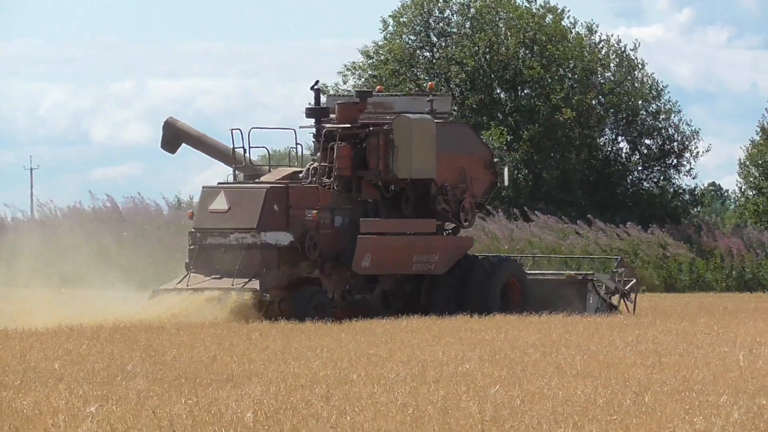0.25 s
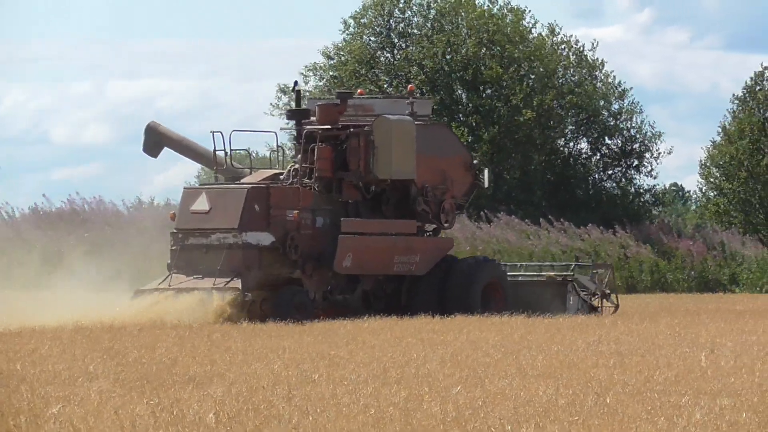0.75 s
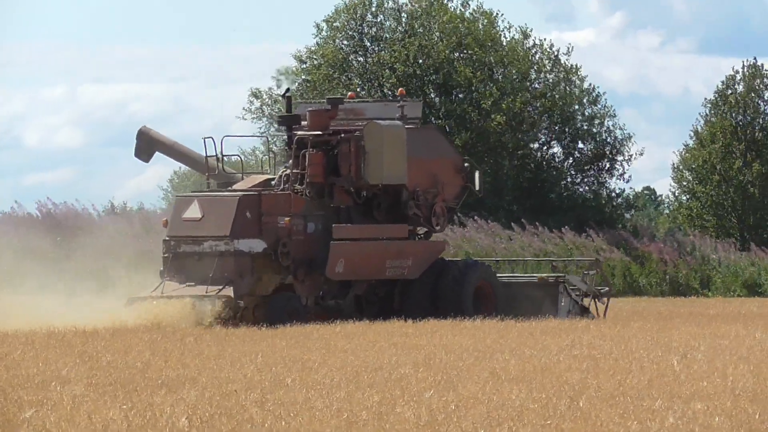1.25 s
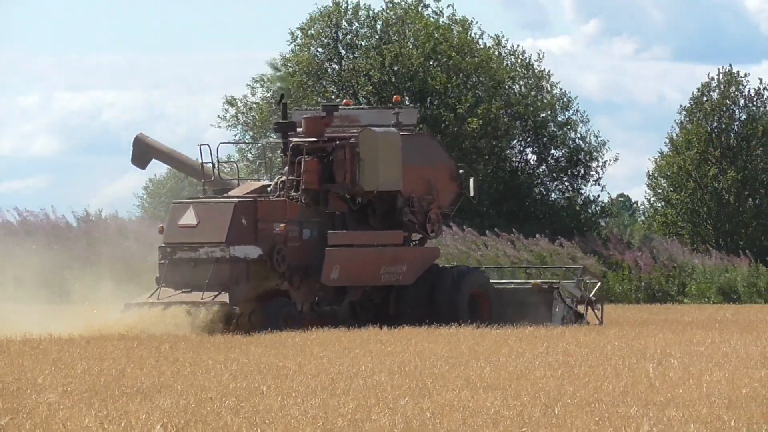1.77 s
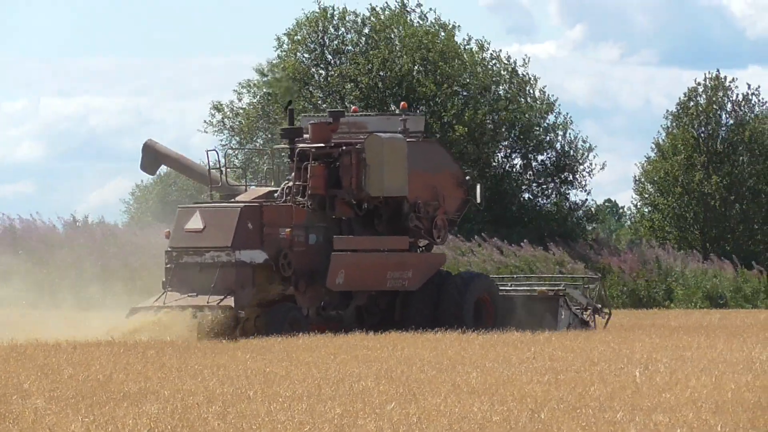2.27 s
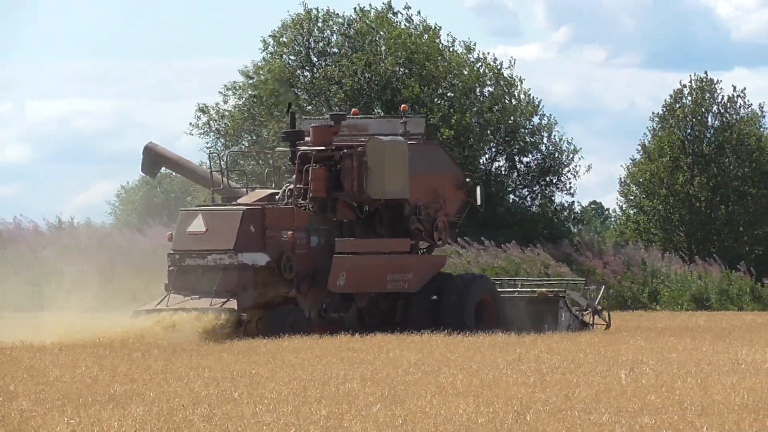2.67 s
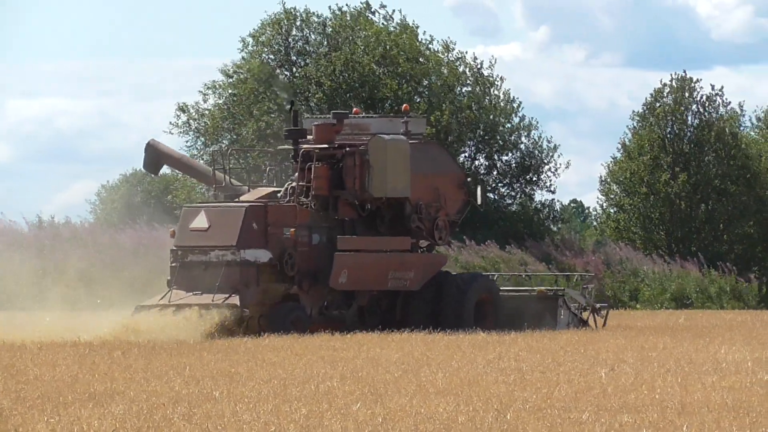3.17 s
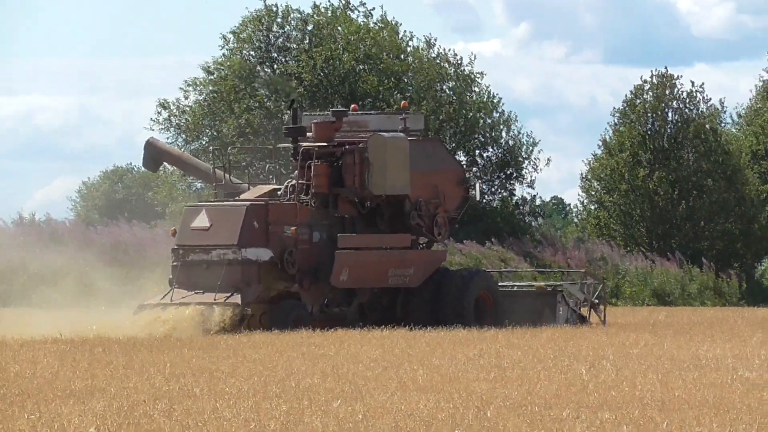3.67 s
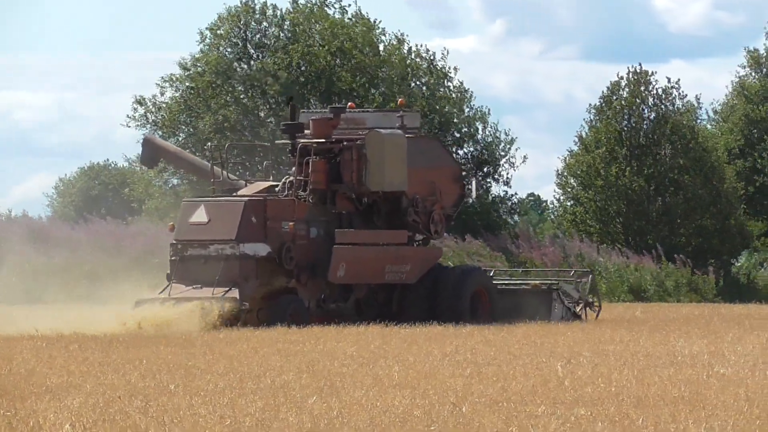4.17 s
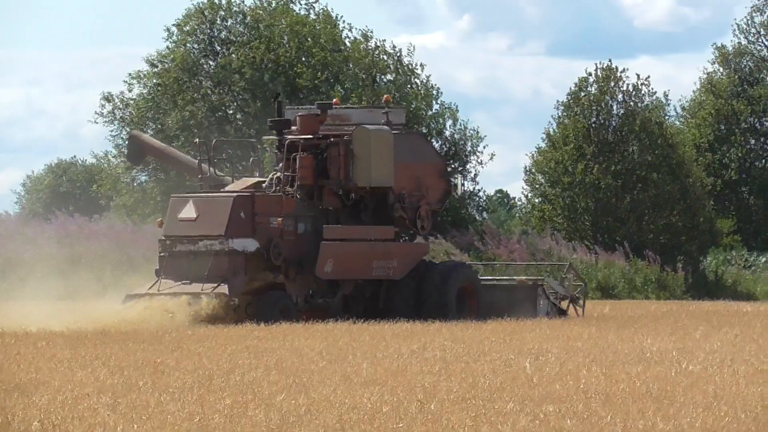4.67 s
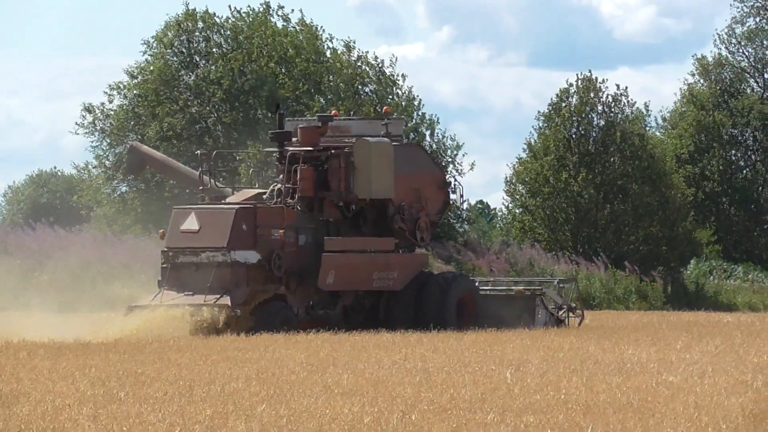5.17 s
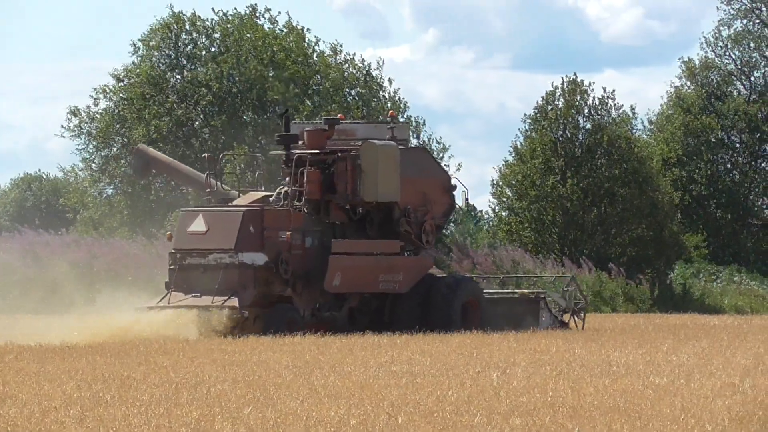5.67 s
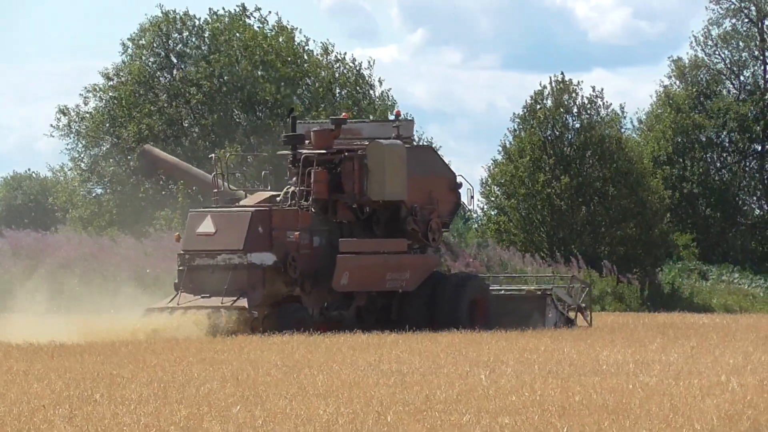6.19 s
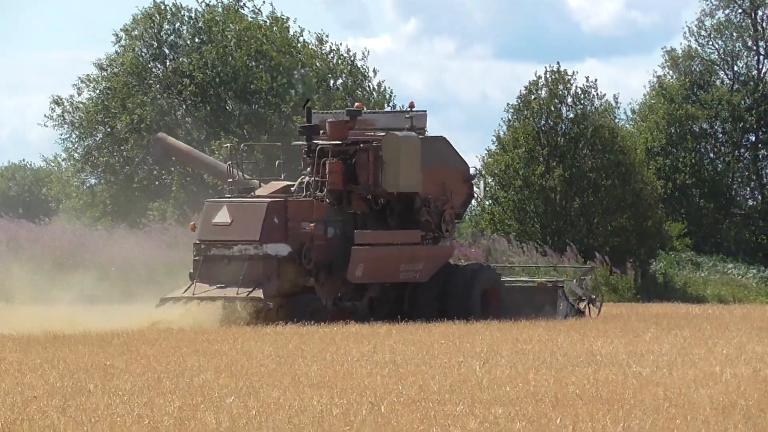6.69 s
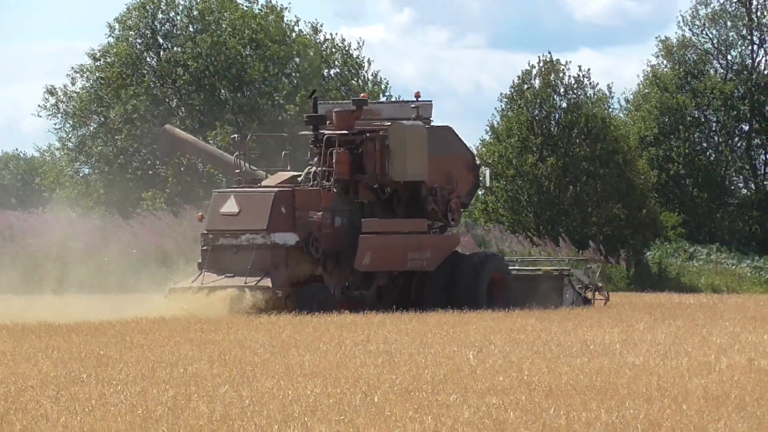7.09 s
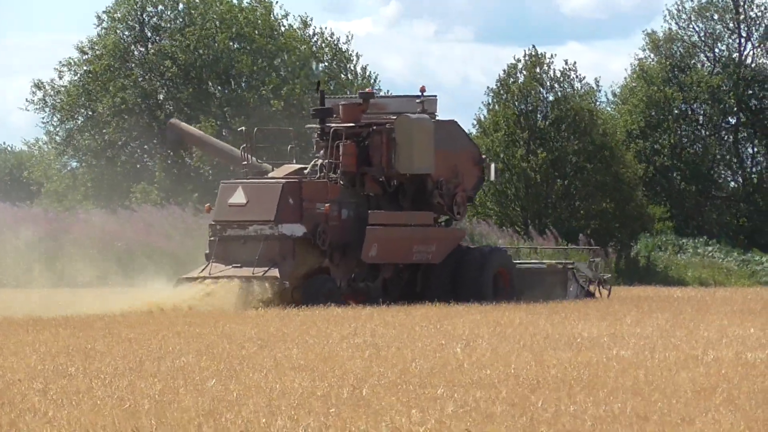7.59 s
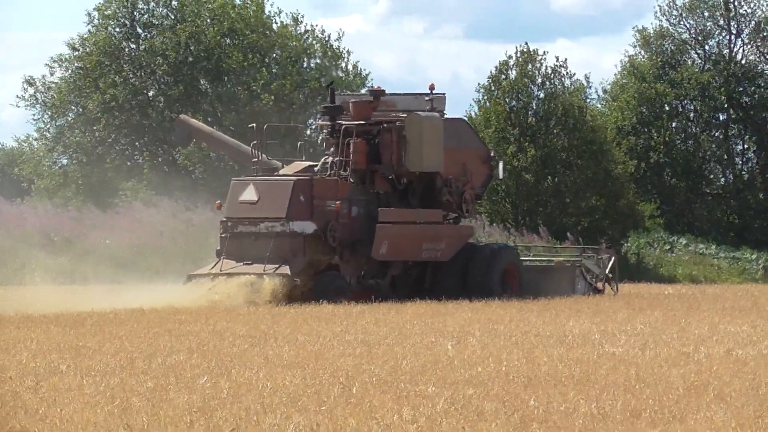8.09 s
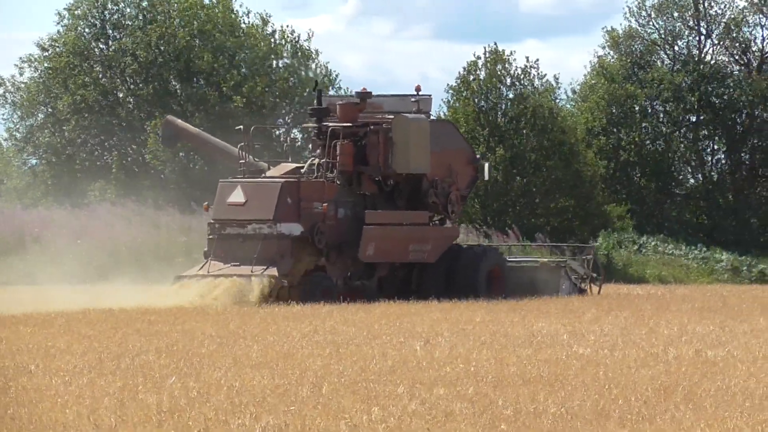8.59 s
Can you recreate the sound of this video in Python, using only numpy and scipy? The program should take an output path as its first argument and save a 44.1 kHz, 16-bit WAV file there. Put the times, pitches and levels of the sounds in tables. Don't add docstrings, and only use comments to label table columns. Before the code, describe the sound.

For about 8.8 seconds, wind buffets a small camera microphone in an open grain field, with a combine harvester roaring some fifty metres away. Low rumble and soft, dull slaps dominate from the start, a strong slap landing near 0.3 s and others following irregularly throughout. Behind them the machine runs continuously: dense dry rattle of straw and grain, metallic mid-range roar, airy chaff hiss and rapid exhaust throbbing. A thin, very high turbo whistle flashes out around 0.8, 1.75 and 2.5 s, with gear tones also singing near 2.5-2.8 s. From 3.5 to 5.5 s the air often clears, bringing brighter hiss, whistle and hollow casing rings around 4.5-5.3 s. The wind dips briefly near 6.55 s; casing resonance returns around 7-7.4 s as gusts swell. After 8 s the machine dulls somewhat, still running beneath fluttering wind.

```python
import sys
import numpy as np
from scipy import signal
from scipy.fft import rfft, irfft
from scipy.io import wavfile
from scipy.ndimage import uniform_filter1d

SR = 44100
rng = np.random.default_rng(int(sys.argv[2]) if len(sys.argv) > 2 else 0)


def undo_db(level):
    steps = np.asarray(level, float) / 20
    return 10 ** steps


def persist_wave(psi):
    counts = np.round(np.clip(psi, -1, 1) * 32767).astype(np.int16)
    wavfile.write(sys.argv[1], SR, np.atleast_2d(counts).T)


N = 389844

# (t/s, buffet level/dB)
WIND = [(0.0, -19), (0.8, -20), (1.61, -20), (2.41, -20.5), (3.21, -22.3), (4.02, -21), (4.82, -25.5),
        (5.63, -21), (6.43, -25), (7.23, -25.5), (8.04, -23.5), (8.84, -26)]
# (f/Hz, level/dB per Hz)
WIND_COLOUR = [(13, -63), (22, -35.5), (123, -1), (174, 0.5), (285, -4), (535, -16.5), (1300, -33.5),
               (1690, -44.5), (2860, -120)]
WIND_BANDS_HZ = (55, 130, 250, 600)
# (t/s, change/dB, half length/s)
GUSTS = [(0.48, -6.5, 0.02), (0.96, -1.5, 0.039), (1.25, 1.5, 0.034), (1.34, -8, 0.027), (1.42, 14, 0.021),
         (2.75, 5.5, 0.05), (2.94, 7, 0.05), (3.07, -6.5, 0.04), (3.38, -3.5, 0.063), (3.6, 6, 0.015),
         (3.68, -5, 0.033), (3.84, 11, 0.034), (4.1, -7.5, 0.029), (4.69, -6, 0.026), (4.91, 5.5, 0.054),
         (5.12, 4.5, 0.016), (5.31, -2, 0.066), (5.48, -7, 0.05), (5.95, -1.5, 0.028), (6.15, 7, 0.026),
         (6.29, 6.5, 0.02), (6.55, -9, 0.023), (6.68, 7, 0.034), (7.13, 6.5, 0.048), (7.36, 9, 0.049),
         (7.63, 7.5, 0.087), (7.77, 5.5, 0.22), (8.08, 8.5, 0.02), (8.38, 0, 0.015), (8.49, 7, 0.055),
         (0.1, 4.5, 0.027), (0.66, 3, 0.035), (1.52, 2.5, .04), (1.75, -3.5, 0.036), (1.95, 3, 0.024),
         (2.06, 5.5, 0.019), (2.25, -1.5, 0.043), (2.4, 0.5, 0.036), (2.52, 5, 0.018), (3.2, -0.5, 0.035),
         (4.25, -1, .04), (4.5, -3, 0.042), (5.6, 6, 0.027), (5.8, 2.5, 0.033), (6.85, 3.5, 0.043),
         (6.96, 5, 0.044), (8.25, -0.5, .04), (8.7, 0.5, 0.07)]
# (t/s, change/dB, half length/s)
ROLLS = [(0.35, 6, 0.08), (0.74, 5.5, 0.081), (1.3, -11, 0.058), (1.47, -1, 0.04), (3.62, 1, 0.019),
         (3.78, 5, 0.074), (4.69, -9, 0.04), (4.85, 9.5, 0.05), (5.15, -8, 0.041), (5.22, 8, 0.059),
         (5.4, 10, 0.037), (5.59, 6.5, 0.071), (6.01, 10, 0.04), (6.53, -10, 0.065), (6.85, 6.5, 0.033),
         (6.96, -10, 0.034), (7.59, 13, 0.025), (8.02, -7, 0.033), (8.21, -5, 0.15), (8.75, -10, 0.036)]
# (t/s, change/dB, half length/s)
RUSTLES = [(0.18, 6.5, 0.043), (1.24, -9, 0.034), (1.33, 7, 0.026), (1.71, -5.5, 0.051), (2.02, 4, 0.036),
           (2.46, 3.5, 0.054), (2.72, -5, 0.13), (3.17, -7, 0.07), (3.54, 1.5, 0.064), (4.26, -5, 0.046),
           (4.92, -6, 0.09), (5.43, 6, 0.081), (5.96, 6.5, 0.05), (6.15, -2.5, 0.085), (7.38, 8, 0.042),
           (7.69, 5.5, 0.034), (8.12, 9, 0.02), (8.24, -5, 0.09), (8.41, 9, 0.05), (8.58, 9, 0.054),
           (0.34, 6.5, 0.02), (0.65, 4, 0.021), (0.95, -4, 0.032), (1.45, -2.5, 0.071), (2.2, 3, .04),
           (3.9, -4, .04), (4.6, -3, 0.059), (5.2, 4.5, 0.022), (5.65, -3.5, 0.046), (6.52, 0, .04),
           (6.65, 6.5, .04), (7.0, 3.7, 0.1), (8.78, 0, 0.038)]
# (t/s, change/dB, half length/s)
LULL = [
    (6.555, -10, 0.022),
]
# (t/s, peak level/dB, ring f/Hz)
SLAPS = [(0.258, 0, 230), (0.383, -7, 221), (0.669, -10.5, 170), (0.752, -6, 212), (1.139, -3, 283),
         (1.227, -3, 217), (1.409, -4, 236), (1.787, -6, 255), (1.841, -4.5, 224), (2.17, -4, 260),
         (2.716, -6.5, 236), (2.8, -6, 227), (2.852, -5.5, 147), (2.914, -7, 226), (2.973, -7, 185),
         (3.183, -6, 205), (3.252, -10, 258), (3.516, -4, 266), (3.722, -5, 288), (3.836, -1, 211),
         (3.916, -12, 261), (4.025, -16, 182), (4.242, -5, 255), (4.37, -6, 184), (4.597, -8.5, 162),
         (4.815, -8.5, 168), (4.948, -6.5, 177), (5.043, -10.5, 167), (5.094, -8, 183), (5.328, -4.5, 214),
         (5.562, -5, 255), (6.011, -4.5, 174), (6.101, -9, 172), (6.312, -9, 176), (6.598, -13, 160),
         (6.772, -8, 167), (6.89, -7, 178), (6.96, -8, 225), (7.128, -3.5, 194), (7.206, -7, 226),
         (7.514, -12, 220), (7.594, -4.5, 190), (7.724, -9, 157), (7.795, -4, 215), (8.048, -5.5, 242),
         (8.375, -5, 202)]
# (t/s, peak level/dB, ring f/Hz)
FLICKS = [(0.104, -16.5, 450), (0.203, -19, 452), (0.314, -16.5, 466), (0.944, -22, 563), (1.426, -29, 490),
          (1.549, -21, 690), (2.014, -15, 471), (2.141, -21, 452), (3.389, -23, 665), (4.37, -21, 470),
          (6.018, -19.5, 710), (6.5, -21.5, 654), (7.506, -19, 743), (8.303, -21, 525), (8.372, -14, 456)]
THROB = [
    (3, 0.02),
    (4, 0.26),
    (8, 0.12),
]
# (t/s, clearness of the air/dB, crop load/dB)
CARRY = [(0.0, -0.5, 3), (0.59, -2, -1.5), (1.18, -5, 0), (1.77, -2, -3), (2.36, 0.2, 4), (2.95, 0, 1.5),
         (3.54, 4, 2.5), (4.13, 1, 1), (4.71, 4.5, 4), (5.3, 3.5, 2.5), (5.89, -0.5, 0.7), (6.48, 1, 0.5),
         (7.07, 4, 4), (7.66, 2.5, 3), (8.25, -6, -2.5), (8.84, -1, -2)]
# (t/s, change/dB, half length/s)
CLEAR_SPELLS = [(0.25, -1.5, 0.081), (0.48, -3.5, 0.046), (0.7, 1.5, 0.11), (0.83, 0.5, 0.05),
                (2.19, -5.5, 0.074), (2.44, 2, 0.076), (2.53, 4.5, 0.053), (2.6, 1, 0.027),
                (2.74, 4, 0.097), (3.11, -3.5, 0.055), (3.28, 3.5, 0.028), (4.0, 3, 0.038),
                (4.45, -2, 0.05), (4.87, -3, 0.12), (5.32, -2, 0.043), (5.71, -3.5, 0.046), (5.96, 3, 0.04),
                (6.12, -3, 0.075), (6.6, 2.5, 0.085), (6.81, -2.5, 0.059), (7.7, 0, 0.062),
                (7.84, 1.5, 0.05), (2.95, 0, .04), (3.2, 1, 0.036), (4.15, 2.5, .05), (3.7, -1.3, .1),
                (5.1, -0.5, 0.055), (7.05, 2, .12), (7.5, -2, .05), (8.55, 0, .05), (8.68, -3, 0.056),
                (0.1, 4, 0.013), (0.65, 2.5, 0.023), (2.03, 0.7, 0.018), (1.4, 0, 0.052), (1.9, 0, .06),
                (8.41, 3.5, 0.11)]
# (t/s, change/dB, half length/s)
SURGES = [(0.67, 6, 0.047), (0.78, 4, 0.05), (0.98, -2, 0.05), (1.57, 3, 0.099), (1.89, 3, 0.04),
          (2.23, -5.5, 0.12), (2.34, -0.5, 0.036), (3.14, -2, 0.14), (3.42, -2.9, 0.11),
          (3.92, -2.5, 0.032), (4.24, -3.5, 0.04), (4.32, -2, 0.19), (4.44, -0.5, 0.04), (4.91, -3, 0.061),
          (5.12, 0, 0.056), (5.33, -2.5, 0.044), (5.69, -3, 0.05), (6.1, -2.5, 0.18), (7.28, 2, 0.13),
          (7.96, -2, 0.06), (8.19, -2, 0.037), (8.43, 2, 0.11)]
# (f/Hz, level/dB per Hz)
MACHINE_COLOUR = [(500, -4), (800, 6.5), (1440, -2), (1770, -15.5), (2110, -11.5), (2350, -15.5),
                  (2560, -20.5), (2800, -18.5), (4700, -23), (5700, -23), (6600, -21.5), (7520, -23),
                  (9300, -17), (15500, -31)]
CARRY_BANDS_HZ = (1400, 2200, 5000, 11500)
# (mean level/dB, change/dB per dB of clearness, change/dB per dB of load)
PARTS = [
    (-41.5, -0.4, 1.55),
    (-51, 0.03, 1.62),
    (-53, 1.24, 0.02),
    (-61, 0.76, -0.2),
]
# (f/Hz, level over the shaft's singing level/dB, wander/Hz)
GEARS = [
    [(2058, 4.5, 18), (2184, 3.5, 18), (3102, -3, 12)],
    [(4593, -3.5, 6)],
    [(6386, -7, 10), (6596, -2, 9), (7122, -6, 16)],
    [(4112, 0, 10)],
]
# (t/s, gain/dB, half length/s)
SING = [
    [(2.8, 8, 0.15), (4.9, 5, 0.38), (5.1, 9, .06), (7.19, 4, 0.16), (5.12, 2.5, .06)],
    [(1.5, 5, 0.11), (1.8, 7, .05), (2.02, 1, .08), (6.7, 0, .06), (2.54, 15, .09), (3.4, -1, .2),
     (4.0, 3, .06), (4.37, 9, 0.044), (4.68, 5, .07), (5.22, 6, .07), (5.6, 5, .1), (5.96, 6, .04),
     (8.39, 10, .05)],
    [(1.7, 6, .25), (2.6, 9, .1), (4.65, 5, .07), (5.5, 4, .15), (5.96, 6, .05), (7.04, 4, .08),
     (7.85, 6, .05)],
    [(2.53, 12, .04), (2.76, 8, .05), (3.45, 13, .04), (4.0, 11, 0.083), (5.0, 9, .08), (5.25, 5, .05),
     (5.78, 11, .05), (5.93, 14, .05)],
]
# (t/s, gain/dB, half length/s)
CASING_RINGS = [(0.65, 19, 0.044), (2.5, 9, 0.069), (4.52, 14, 0.11), (4.78, 12, 0.1), (4.95, 15, 0.098),
                (5.15, 14, .1), (5.35, 11, 0.046), (6.95, 8, 0.16), (7.15, 15, .1), (7.35, 14, 0.097),
                (7.65, 2, 0.066)]
# (t/s, level/dB)
TURBO = [(0.0, -54.5), (0.8, -62.5), (1.61, -59.5), (2.41, -51.5), (3.21, -54.5), (4.02, -45),
         (4.82, -50.5), (5.63, -50), (6.43, -54.5), (7.23, -52), (8.04, -55), (8.84, -57)]
# (t/s, blade tone f/Hz)
TURBO_HZ = [(0, 9415), (.25, 9430), (.57, 9302), (1.06, 9262), (1.6, 9135), (2.3, 9095), (3.1, 9173),
            (3.67, 9365), (4.4, 9348), (4.68, 9380), (5.2, 9200), (5.42, 9288), (5.95, 9303), (6.45, 9450),
            (6.9, 9326), (7.3, 9375), (8.2, 9225), (8.84, 9369)]
# (t/s, gain/dB, half length/s)
FLASHES = [(0.32, 12, 0.026), (0.64, 8, 0.03), (0.83, 16, 0.034), (1.07, 8, 0.076), (1.52, 14, 0.011),
           (1.58, 15, 0.048), (1.66, 7.4, 0.03), (1.75, 20.5, 0.045), (1.85, 12, 0.03), (2.06, 11, 0.046),
           (2.37, 11.5, 0.037), (2.52, 19, 0.053), (2.72, 8, 0.027), (3.62, 5.5, 0.13), (4.74, 5.5, 0.061),
           (5.12, 7, 0.034), (5.28, 11, 0.033), (5.43, 12.5, 0.068), (5.51, 10, 0.012), (5.58, 16, 0.017),
           (5.73, 9.5, 0.038), (6.08, 7, 0.062), (6.26, 10, 0.04), (6.63, 13, 0.15), (6.73, 5, 0.018),
           (6.98, 10.5, 0.063), (7.15, 10, 0.02), (7.45, 12, 0.023), (7.57, 13, 0.011), (7.67, 14, 0.02),
           (3.85, -1, .04), (4.0, 5, .04), (4.3, -2.5, 0.059), (4.55, -1, 0.046), (4.95, 2, .05),
           (6.8, -1, 0.051), (7.3, 3, .03), (7.85, -7, 0.05), (8.2, 2, .04), (8.35, -7, 0.055),
           (8.55, 2, .06), (8.75, 0, .04)]
# (f/Hz, level against the local mean below which a line is lost/dB)
THIN_DB = [(2500, -17.5), (5450, -20), (5650, 6), (5850, -8), (6220, 4.5), (6550, -4), (7600, -0.2),
           (8000, -14), (9300, -5), (9620, -4), (10200, -3), (11000, -5), (13000, 0), (14800, 3),
           (15600, 8)]
# (f/Hz, side minus mid level/dB)
SIDE_DB = [(60, -35), (200, -28.5), (500, -34), (1000, -22), (2000, -14), (4000, -13.5), (8000, -9),
           (14000, -14)]


def smooth_twice(x, size):
    return uniform_filter1d(uniform_filter1d(x, size), size)


def walk(rate):
    k = int(SR / rate)
    held = np.repeat(rng.standard_normal(N // k + 1), k)
    w = smooth_twice(held, k)[:N]
    return w / w.std()


def curves(table):
    s, *columns = np.transpose(table)
    return [np.interp(np.arange(N) / SR, s, c) for c in columns]


def swells(events):
    out = np.zeros(N // 64 + 2)
    t = np.arange(len(out)) * 64 / SR
    for s, db, half_s in events:
        out += db * np.exp(-((t - s) / half_s) ** 2)
    return np.interp(np.arange(N) / SR, t, out)


def on_bins(points):
    hz, value = np.transpose(points)
    return np.interp(np.log(np.arange(N // 2 + 1) * SR / N + 1), np.log(hz), value)


def bands(x, colour, centres_hz):
    spectrum = rfft(x) * undo_db(on_bins(colour))
    hats = np.eye(len(centres_hz))
    parts = [irfft(spectrum * on_bins(np.c_[centres_hz, hat]), N) for hat in hats]
    return [p / p.std() for p in parts]


def even(x, seconds):
    return x / np.sqrt(smooth_twice(x ** 2, int(seconds * SR)) + 1e-12)


def tone(hz, fade_db, flutter_db):
    phase = 2 * np.pi * np.cumsum(hz) / SR + 0.8 * walk(60)
    y = np.sin(phase) * undo_db(fade_db * walk(9.5) + flutter_db * walk(30))
    return y / y.std()


def wind():
    breeze_db, gust_db = curves(WIND)[0], swells(GUSTS)
    eddies = rng.standard_normal(N) * undo_db(1.6 * walk(60))
    deep, low, body, bright = (even(p, 0.11) for p in bands(eddies, WIND_COLOUR, WIND_BANDS_HZ))
    body_db = breeze_db - 0.5 + 0.97 * gust_db + 1.33 * walk(20)
    low_db = np.linspace(-27.5, -23, N) + 0.055 * gust_db
    low_db = low_db + 0.77 * swells(ROLLS) + 0.78 * walk(18)
    bright_db = breeze_db - 8 + 0.4 * gust_db
    bright_db = bright_db + 0.71 * swells(RUSTLES) + 1.32 * walk(16)
    gusty = undo_db(body_db) * body + undo_db(low_db) * low + undo_db(bright_db) * bright
    return undo_db(swells(LULL)) * gusty + deep * undo_db(np.linspace(-38.5, -35, N))


def wind_gives_way():
    duck_db, duck_s = -10.0, 0.009
    return undo_db(swells([(s + duck_s * 0.66, duck_db, duck_s) for s, _, _ in SLAPS + FLICKS]))


def slaps(events, gain_db, cycles, hiss_db, rise_s):
    out, t = np.zeros(N + 2000), np.arange(2000) / SR
    push = (1 - np.exp(-t / rise_s)) ** 2
    noise = rng.standard_normal((len(events), 2 * len(t)))
    band = signal.butter(3, [450, 1000], "band", fs=SR)
    hiss = signal.lfilter(*band, noise)[:, len(t):]
    hiss = hiss * undo_db(hiss_db) / hiss.std() * np.exp(-t / 0.0088)
    for (s, db, hz), burst in zip(events, hiss):
        i = int(s * SR)
        ring = np.sin(2 * np.pi * hz * t) * np.exp(-t * hz / cycles)
        out[i:i + len(t)] += undo_db(db + gain_db) * push * (ring + burst)
    return out[:N]


def throb():
    cycle_hz = 16.82
    turn = 2 * np.pi * np.cumsum(cycle_hz * (1 + 0.0033 * walk(0.75))) / SR
    return sum(depth * np.cos(k * turn) for k, depth in THROB)


def rattle():
    strength = rng.exponential(size=N // 40 + 1).repeat(40)[:N]
    return rng.standard_normal(N) * undo_db(1.2 * strength)


def roar(grains, beat, clear_db, load_db):
    shimmer_db = 0.6 * walk(22)
    parts = bands(grains * (1 + 0.3 * beat), MACHINE_COLOUR, CARRY_BANDS_HZ)
    out = np.zeros(N)
    for part, (db, air, crop) in zip(parts, PARTS):
        level_db = db + air * clear_db + crop * load_db
        out += part * undo_db(level_db + shimmer_db + 0.7 * walk(18))
    return out


def gears(clear_db):
    out = np.zeros(N)
    for shaft, rest_db, moments in zip(GEARS, (-70, -64, -71, -71.5), SING):
        sing_db = rest_db + 1.4 * clear_db + swells(moments)
        for hz, db, wander_hz in shaft:
            mesh = tone(hz + wander_hz * walk(4.6), fade_db=1.0, flutter_db=5.0)
            out += undo_db(sing_db + db) * mesh
    return out


def casing(grains):
    ring_hz, width_hz, rest_db = 1412, 106, -58.5
    hz = np.arange(N // 2 + 1) * SR / N
    ring = irfft(rfft(grains) / (1 + ((hz - ring_hz) / width_hz) ** 4), N)
    return even(ring, 0.11) * undo_db(rest_db + swells(CASING_RINGS))


def machine(beat):
    grains = rattle()
    clear_db, load_db = curves(CARRY)
    clear_db = clear_db + swells(CLEAR_SPELLS) + 0.68 * walk(24)
    load_db = load_db + swells(SURGES)
    return roar(grains, beat, clear_db, load_db) + gears(clear_db) + casing(grains)


def turbo(beat):
    hz, db = curves(TURBO_HZ)[0], curves(TURBO)[0]
    whistle = tone(hz + 14 * walk(40), fade_db=0.5, flutter_db=4.0)
    whistle = whistle * (1 + 0.81 * beat) * undo_db(2.05 * walk(70))
    skirt = np.sin(2 * np.pi * np.cumsum(hz) / SR) * walk(150)
    return undo_db(db + swells(FLASHES) - 1.5) * (whistle + undo_db(-0.5) * skirt)


def scene():
    beat = throb()
    mid = wind() * wind_gives_way()
    mid = mid + slaps(SLAPS, gain_db=4.0, cycles=1.5, hiss_db=-24.0, rise_s=0.002)
    mid = mid + slaps(FLICKS, gain_db=3.0, cycles=1.6, hiss_db=-8.0, rise_s=0.0005)
    mid = mid + machine(beat) + turbo(beat)
    return np.array([mid, mid])


def thin_treble(x):
    hz, _, z = signal.stft(x, SR, nperseg=2048, noverlap=1024)

    def on_hz(points):
        return np.interp(hz, *np.transpose(points))[:, None]

    power = uniform_filter1d(abs(z) ** 2, size=3, axis=0) + 1e-20
    log_mean = uniform_filter1d(np.log(power), size=61, axis=0)
    local = np.exp(uniform_filter1d(log_mean, size=5, axis=1))
    chance = rng.standard_normal((3,) + z.shape)
    patch = uniform_filter1d(chance[0], size=5, axis=0)
    patch_db = 19.0 * uniform_filter1d(patch, size=3, axis=1)
    loud_db = 10 * np.log10(local)
    spare_db = 0.22 * (loud_db - loud_db.mean(axis=1, keepdims=True))
    mid = z * (power > local * undo_db(on_hz(THIN_DB) + patch_db - spare_db) ** 2)
    spell = uniform_filter1d(chance[1, 0], size=3) * 0.83
    spell = spell + 1.6 * uniform_filter1d(chance[1], size=16, axis=0)
    error = np.minimum(abs(mid), 2 * np.sqrt(local)) * np.exp(3j * chance[2])
    side = error * undo_db(on_hz(SIDE_DB) + 8.2 * spell) * (spell > 0.55)
    pair = signal.istft(np.array([mid + side, mid - side]), SR, nperseg=2048, noverlap=1024)[1]
    return pair[:, :N]


def band_limit(x):
    return signal.sosfilt(signal.butter(12, 15630, fs=SR, output="sos"), x)


def record(dry):
    soft = np.tanh(0.88 * dry[0]) / 0.93
    return band_limit(thin_treble(soft))


dry = scene()
out = record(dry)
persist_wave(out)
```